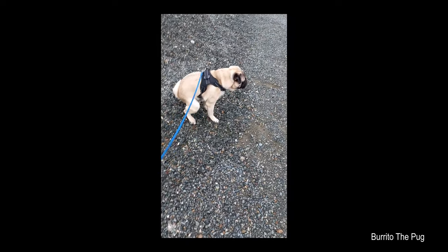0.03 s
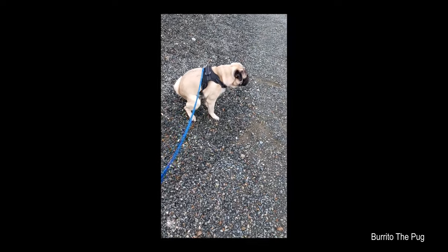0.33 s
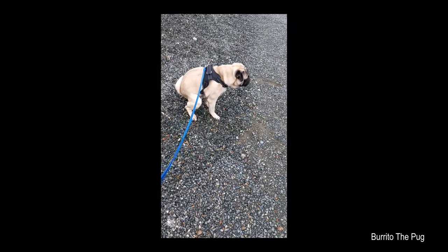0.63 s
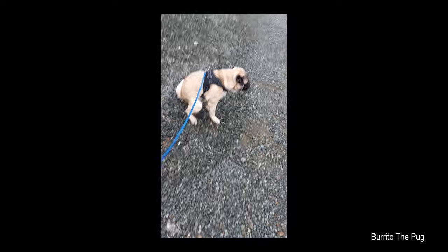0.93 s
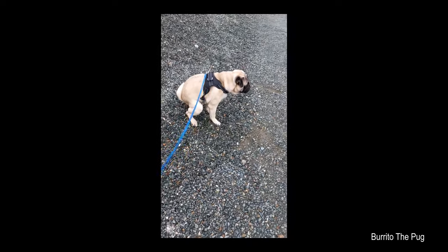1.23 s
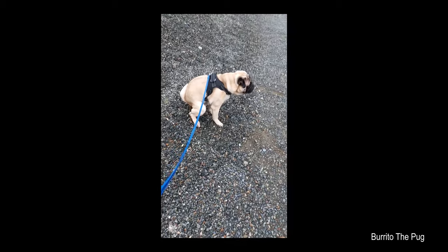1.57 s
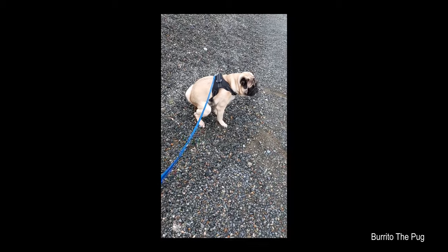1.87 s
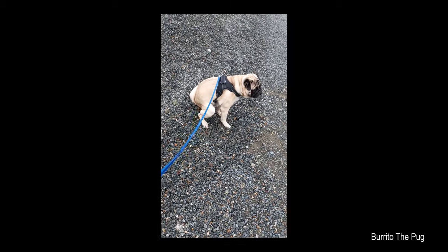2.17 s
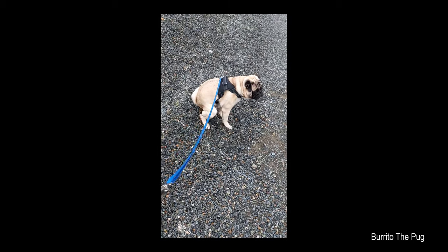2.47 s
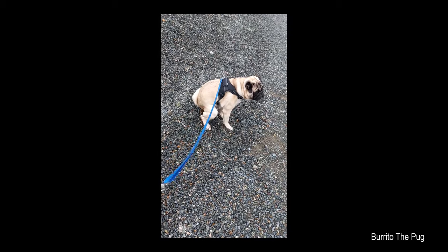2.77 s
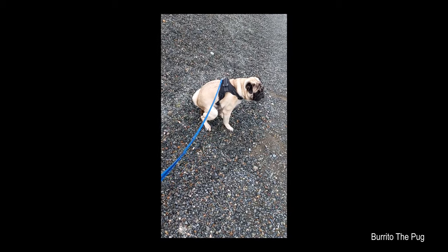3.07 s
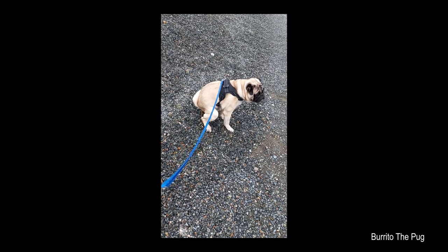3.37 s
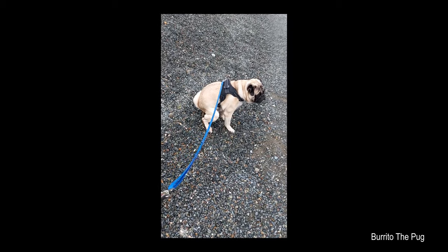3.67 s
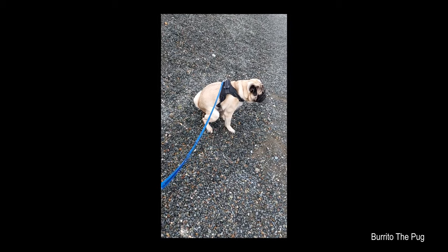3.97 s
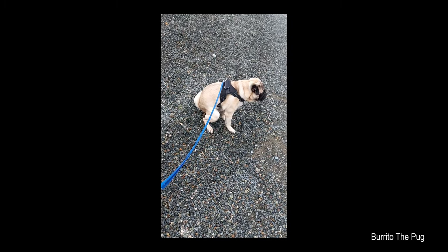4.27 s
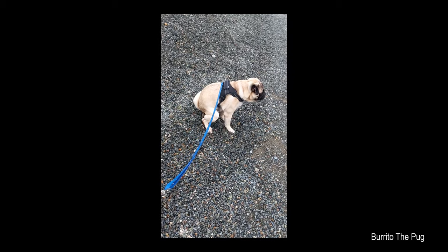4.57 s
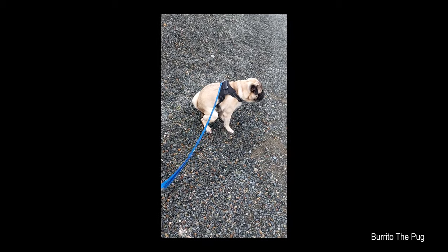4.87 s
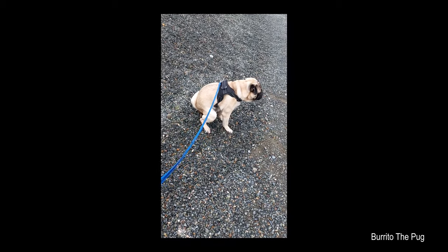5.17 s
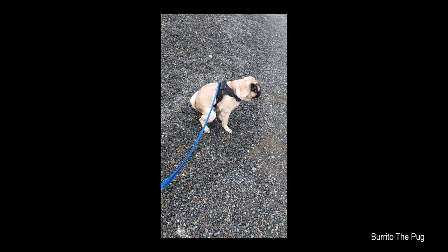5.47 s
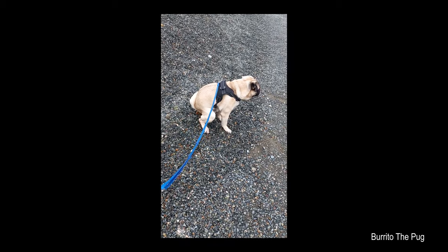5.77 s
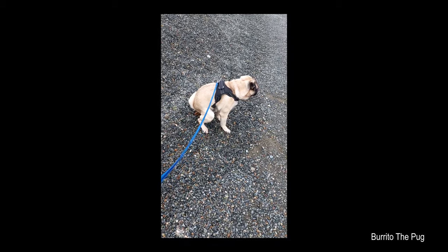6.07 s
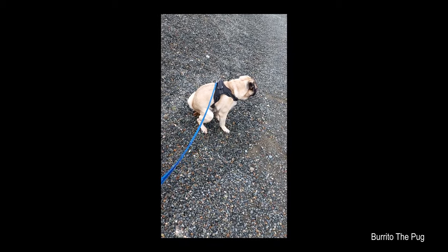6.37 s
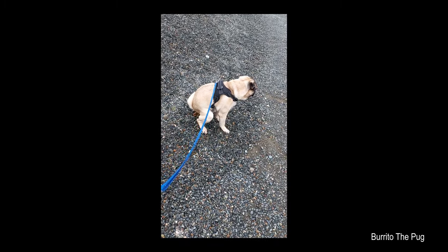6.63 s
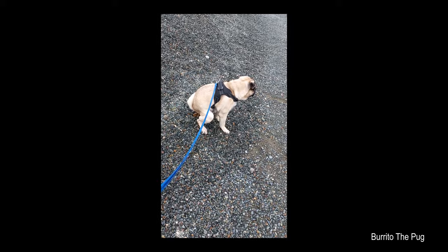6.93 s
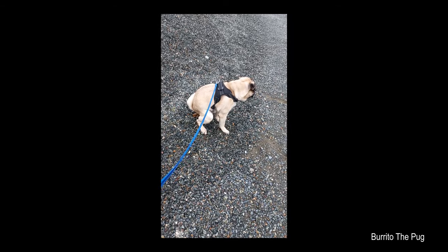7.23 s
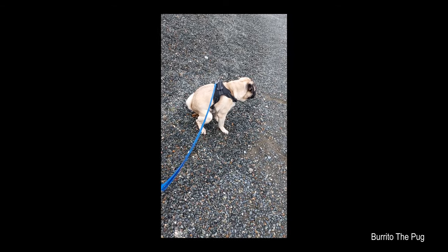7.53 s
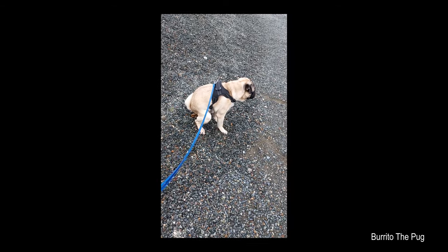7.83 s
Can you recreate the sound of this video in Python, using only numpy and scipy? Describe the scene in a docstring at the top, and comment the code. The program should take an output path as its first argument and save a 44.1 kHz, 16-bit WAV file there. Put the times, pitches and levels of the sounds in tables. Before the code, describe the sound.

Outdoors, wind and a far engine rumble while small birds chirp and whistle, and a leash occasionally scrapes close by.

```python
"""A gravel yard: wind rumble, distant traffic and hiss throughout; hoarse bird chips echo now and then.
From the start a far engine throbs, its uneven firings ringing the exhaust. Near 1 s a leash scrapes,
squeaks and ticks close by. A bird twitters at 2.5 s; the hand bumps the phone at 2.8 s and 4.3 s.
The engine fades by 3.7 s, then four thin, high two-note whistles echo off walls and trees.
From 7 s the leash scrapes again and the engine returns."""
import sys
import numpy as np
from scipy import signal
from scipy.fft import rfft, irfft
from scipy.io import wavfile
from scipy.ndimage import uniform_filter1d

SR = 44100
rng = np.random.default_rng(int(sys.argv[2]) if len(sys.argv) > 2 else 0)


def store_wav(level_fs):
    """Save 16-bit WAV to argv[1]."""
    pcm = np.round(np.clip(np.atleast_2d(level_fs), -1, 1) * 32767)
    wavfile.write(sys.argv[1], SR, pcm.T.astype(np.int16))


N = 357210
T = np.arange(N) / SR

# traffic level: t/s, level/dB
TRAFFIC_LEVEL = [(0.0, -70.5), (1.9, -70.5), (2.7, -72.5), (4.08, -72), (5.28, -74.5), (5.58, -71),
                 (8.1, -71.5)]
# spectra of traffic (mid, side), hiss and wind: f/Hz, level/dB
ROAD_MID_SPECTRUM = [(100, -8), (250, 1), (380, -2.5), (500, 1), (700, -6.5), (1000, -11), (1500, -16.5),
                     (2300, -22), (4000, -28.5)]
ROAD_SIDE_SPECTRUM = [(40, 4.5), (110, 4.5), (250, -4), (500, -9), (800, -12), (1200, -12), (1800, -15.5),
                      (2600, -24), (4000, -38)]
HISS_SPECTRUM = [(500, -12), (1500, 2.5), (2500, -0.5), (4000, 0.5), (5600, -2), (6700, 3.5), (7700, 1),
                 (8600, 1.5), (9400, -4.5), (11000, -2.5), (13000, -0.5), (15500, -3.5)]
WIND_SPECTRUM = [(20, -62), (31, -36.5), (39, -8), (45, -3.5), (56, -9), (75, 1), (120, -3), (155, -8.5),
                 (210, -14), (300, -26), (450, -40.5), (900, -61)]
# exhaust resonances: f/Hz, decay/s, level/dB
EXHAUST_MODES = [(88, 0.017, -18.5), (126.9, 0.022, 0.5), (175, 0.013, -12.5), (296, 0.0042, 3)]
# engine relative to wind: t/s, level/dB
ENGINE_OVER_WIND = [(0, -6), (.8, 0.5), (1.5, 4), (2.6, -4), (3.5, -3), (3.7, -19.5), (6.8, -17.5),
                    (8.1, -1.5)]
# wind plus engine: t/s, level/dB
RUMBLE_LEVEL = [(0.0, -57), (0.5, -52), (0.7, -56), (1.0, -46.5), (1.2, -51), (1.6, -43.5), (2.7, -51),
                (3.52, -46.5), (3.72, -55.5), (4.64, -52), (5.64, -53.5), (6.14, -60.5), (6.34, -55.0),
                (7.04, -57.0), (7.14, -52.5), (8.1, -51.5)]
# hand on the phone: t/s, rise/s, hold/s, decay/s, level/dB
HAND_BUMPS = [(2.798, 0.016, 0.068, 0.13, -32.5), (4.278, 0.03, 0.11, 0.059, -42)]
# hand rub: f/Hz, level/dB
RUB_SPECTRUM = [(28, -36), (45, -8), (75, 0.5), (120, 1.5), (160, -7.5), (205, -6), (260, -18), (350, -26),
                (500, -32), (700, -44.5), (1500, -56), (4000, -63.5)]
# phone judder in the grip: t/s, length/s, f0/Hz, f1/Hz, level/dB
GRIP_JUDDER = [(2.785, .08, 120, 112, -25)]
# leash scrapes: t/s, rise/s, hold/s, decay/s, level/dB, brightness/0-1, left-right/dB
LEASH_SCRAPES = [(0.811, 0.045, 0.02, 0.054, -61.5, 0.17, -3), (1.033, 0.017, 0.018, 0.043, -73, 0.5, 0),
                 (1.453, 0.019, 0.046, 0.043, -49.5, 1, 1.5), (2.144, .008, 0.026, 0.12, -66, 0.03, -3),
                 (2.977, 0.065, 0.087, 0.075, -69.5, 0.13, -2),
                 (7.148, 0.031, 0.019, 0.082, -62.5, 0.13, -2.5),
                 (7.613, 0.0025, 0.01, 0.033, -61.5, 0.84, 1), (7.622, 0.047, 0.23, 0.18, -71.5, 0, -1.5),
                 (7.752, 0.043, 0.031, 0.033, -51.5, 1, 2)]
# leash squeaks: t/s, length/s, f0/Hz, f1/Hz, level/dB
LEASH_SQUEAKS = [(.835, .066, 3400, 2900, -70), (.845, .11, 2635, 2620, -66.5),
                 (7.18, .05, 2100, 2000, -72.5), (7.2, .025, 2640, 2630, -65)]
# clasp and grit ticks: t/s, level/dB
CLASP_TICKS = [(1.011, -56), (1.48, -46.5), (7.618, -51), (7.763, -53), (7.856, -54)]
# spectra of scrapes and ticks: f/Hz, level/dB
DULL_SPECTRUM = [(900, -20), (1600, -7), (2100, -6.5), (2650, -8.5), (3600, -3.5), (4400, -7), (5400, -10),
                 (6300, -7.5), (7600, -3), (8600, -10.5), (11000, -18.5), (15500, -31)]
BRIGHT_SPECTRUM = [(1500, -39), (3200, -9.5), (5000, -3.5), (6300, -9.5), (7400, 5), (8500, -5.5),
                   (9800, -1.5), (11500, 5.5), (13500, -1), (15500, 4.5)]
TICK_SPECTRUM = [(1500, -3), (4000, -4), (7500, 14.5), (10000, 11), (15500, -6)]
# hand shading the left mic port: f/Hz, gain/dB
HAND_SHADE = [(500, 3), (8500, -1.5), (12000, -8), (16000, -15)]
# faint far whistles and hoarse chips: t/s, length/s, f0/Hz, f1/Hz, level/dB
FAR_NOTES = [(1.3, 0.55, 1660, 1584, -79), (2.93, .62, 1840, 1290, -75.5), (5.08, 0.16, 4140, 4250, -77.5),
             (5.1, 0.74, 2506, 2492, -83), (5.22, 0.077, 3930, 3900, -74), (5.23, 0.36, 4810, 4800, -74),
             (5.35, 0.43, 1246, 1217, -77), (6.08, 0.55, 2506, 2520, -80.5), (6.61, 0.28, 4870, 4880, -70),
             (7.08, .036, 3840, 3830, -57.5), (7.1, .22, 4170, 3680, -67.5)]
CHIP_NOTES = [(.412, 0.068, 4900, 3580, -65.5), (1.575, 0.035, 3300, 5120, -64.5),
              (1.745, 0.046, 2940, 5130, -70.5), (3.36, 0.03, 3060, 3900, -79),
              (3.5, 0.039, 2750, 5200, -73), (4.305, 0.03, 5500, 4350, -65.5),
              (4.805, .031, 3200, 4450, -73), (6.985, 0.057, 4600, 3860, -66.5),
              (7.13, 0.12, 3400, 3070, -74)]
# runs of falling notes: t/s, length/s, rate/Hz, level/dB
TWITTER_RUNS = [(2.456, .21, 32, -58), (2.713, 0.11, 39, -56.5)]
# two-note whistles: t/s, length1/s, length2/s, f1/Hz, glide1/Hz, f2/Hz, glide2/Hz,
# level at step/dB, swell/(dB/s), overtone/dB, rasp/dB
WHISTLE_CALLS = [(3.921, 0.38, 0.39, 5588, 191, 6040, 89, -59, 2, -20, -20),
                 (5.325, 0.41, 0.28, 5155, -35, 5264, 9, -49, 14.5, -25.5, -24),
                 (6.674, .335, 0.0984, 5165, 110, 5250, -165, -48, 35, -20, -15),
                 (7.64, 0.24, .25, 5075, 29.5, 5240, -130, -58.5, 20, -35, -10.5)]


def undb(db):
    """Decibels to gain."""
    return 10 ** (np.asarray(db) / 20)


def unit(x):
    """Scale to rms 1."""
    return x / np.sqrt(np.mean(x ** 2))


def curve(rows):
    """Linear interpolation of (t/s, value) rows."""
    return np.interp(T, *np.transpose(rows))


def colour(x, spectrum):
    """Filter by (f/Hz, level/dB) rows; 12 dB/octave skirts outside."""
    hz, db = np.transpose(spectrum)
    f = np.arange(N // 2 + 1) * SR / N + 1
    skirts = np.minimum(f / hz[0], 1) * np.minimum(hz[-1] / f, 1)
    gain = undb(np.interp(np.log(f), np.log(hz), db))
    return irfft(rfft(x) * gain * skirts ** 2, N)


def noise(spectrum, channels=1):
    """Independent coloured noises, rms 1."""
    return unit(colour(rng.standard_normal((channels, N)), spectrum))


def walk(rate_hz):
    """Smooth random drift, spread near 1."""
    k = max(int(SR / rate_hz), 1)
    steps = rng.standard_normal(N)[np.arange(N) // k]
    return 1.3 * uniform_filter1d(uniform_filter1d(steps, k), k)


def swell(start_s, rise_s, hold_s, decay_s):
    """Contact envelope: ramp, hold, exponential decay."""
    t = T - start_s
    return np.clip(t / rise_s, 0, 1) * np.exp(-np.maximum(t - rise_s - hold_s, 0) / decay_s)


def pan(db):
    """Gains for a left-minus-right level."""
    return undb(np.array([[db], [-db]]) / 2)


def tones(notes, waver, rasp_db, rasp_hz, edge, bend=0, overtone_db=-24):
    """Wavering glides with a hoarse noise band. edge: fade share; bend > 0: fast at first."""
    out = np.zeros(N)
    drift = 1 + waver * walk(90)
    rasp = 1 + undb(rasp_db) * (walk(rasp_hz) + 1j * walk(rasp_hz))
    for start_s, length_s, first_hz, last_hz, db in notes:
        span = slice(int(start_s * SR), min(int((start_s + length_s) * SR), N))
        u = np.clip((T[span] - start_s) / length_s, 0, 1)
        hz = first_hz + (last_hz - first_hz) * (u + bend * u * (1 - u))
        phasor = np.exp(2j * np.pi * np.cumsum(hz * drift[span]) / SR)
        fade = np.sin(np.pi / 2 * np.clip(np.minimum(u, 1 - u) / edge, 0, 1))
        out[span] += undb(db) * fade * np.imag(rasp[span] * (phasor + undb(overtone_db) * phasor ** 2))
    return out


def yard(x, t60_s, wet_db, direct_db):
    """Direct sound reaches the left port first; walls and trees scatter to both."""
    t = T[:SR]
    echoes = rng.standard_normal((2, SR)) ** 3 * undb(-60 * t / t60_s) * np.minimum(t / 0.021, 1)
    wet = signal.fftconvolve(x[None], echoes, axes=1)[:, :N]
    wet *= np.std(x) / np.std(wet, axis=1, keepdims=True)
    direct = np.array([x, np.roll(x, 16)])
    return undb(direct_db) * direct + undb(wet_db) * wet


def traffic_and_hiss():
    """Distant traffic swells under a wide hiss; the treble flickers."""
    road = noise(ROAD_MID_SPECTRUM) + undb(1) * noise(ROAD_SIDE_SPECTRUM) * np.array([[1], [-1]])
    hiss = undb(-76) * noise(HISS_SPECTRUM, channels=2)
    flicker = undb(-85 + 1.3 * walk(9)) * noise([(6300, -9.5), (7500, 6.5), (8700, -15)], channels=2)
    road_db = curve(TRAFFIC_LEVEL) + 1.4 * walk(7.1)
    return pan(0.99) * road * undb(road_db) + pan(-0.49) * (hiss + flicker)


def engine(firing_hz=19.9):
    """Firings of uneven strength ring the low exhaust resonances."""
    cycle = (T * firing_hz).astype(int)
    pulses = np.diff(cycle, prepend=0) * undb(2.04 * rng.standard_normal(N)[cycle])
    t = T[:SR // 4]
    pipe = sum(undb(db) * np.cos(2 * np.pi * hz * t) * np.exp(-t / decay_s)
               for hz, decay_s, db in EXHAUST_MODES)
    pipe *= np.minimum(t / 0.0036, 1)  # distance blurs each firing
    throb = signal.fftconvolve(pulses, pipe)[:N]
    return unit(colour(throb, [(55, 12), (200, 6.5), (330, -4.5), (600, -28)]))


def rumble():
    """Wind and far engine, common to both ports, plus eddies at each."""
    ratio = undb(curve(ENGINE_OVER_WIND))
    bass = (noise(WIND_SPECTRUM) + ratio * engine()) / np.sqrt(1 + ratio ** 2)
    eddies = undb(-17) * noise(WIND_SPECTRUM, channels=2)
    return (bass + eddies) * undb(curve(RUMBLE_LEVEL))


def bumps():
    """The hand rubs the phone twice; the grip judders the first time."""
    push = sum(undb(db) * swell(*timing_s) for *timing_s, db in HAND_BUMPS)
    rub = noise(RUB_SPECTRUM) + undb(-13.5) * noise(RUB_SPECTRUM, channels=2)
    judder = tones(GRIP_JUDDER, waver=0.016, rasp_db=-22.5, rasp_hz=100.6, edge=0.31, overtone_db=-21.5)
    return push * rub + judder


def leash():
    """Webbing slides in tiny slips and squeaks; clasp and grit tick."""
    dull = noise(DULL_SPECTRUM, channels=2)
    left, right = noise(BRIGHT_SPECTRUM, channels=2)
    bright = np.array([colour(left, HAND_SHADE), right])
    scrapes = np.zeros((2, N))
    for *timing_s, db, brightness, pan_db in LEASH_SCRAPES:
        friction = np.sqrt(1 - brightness) * dull + np.sqrt(brightness) * bright
        scrapes += pan(pan_db) * undb(db) * swell(*timing_s) * friction
    slips = undb(1.8 * walk(450))
    hits = sum(undb(db) * swell(start_s, 0.00068, 0.00052, 0.00038) for start_s, db in CLASP_TICKS)
    ticks = hits * noise(TICK_SPECTRUM, channels=2)
    squeaks = tones(LEASH_SQUEAKS, waver=0.007, rasp_db=-8, rasp_hz=700, edge=0.3, overtone_db=-10)
    return scrapes * slips + pan(-3.6) * ticks + yard(squeaks, t60_s=0.26, wet_db=2, direct_db=3)


def twitter(top_hz=6100, fall_hz=610, note_s=0.016, crest=0.4, slope_db_per_run=22.5):
    """Quick runs of one falling note, pitch scattered, loudest at the crest."""
    notes = []
    for start_s, length_s, rate_hz, db in TWITTER_RUNS:
        for t in np.arange(0, length_s, 1 / rate_hz):
            hz = top_hz + 70 * rng.standard_normal()
            drop_db = slope_db_per_run * abs(t / length_s - crest)
            notes.append((start_s + t, note_s, hz, hz - fall_hz, db - drop_db))
    return tones(notes, waver=0.012, rasp_db=-7.5, rasp_hz=698, edge=0.52, bend=-0.4)


def whistle(start_s, first_s, second_s, first_hz, first_glide_hz, second_hz, second_glide_hz,
            db, swell_db_per_s, overtone_db, rasp_db, overlap_s=0.059):
    """Two thin notes; swells up to the step between them, then fades."""
    step_s = start_s + first_s
    notes = [(start_s, first_s + overlap_s, first_hz, first_hz + first_glide_hz, db),
             (step_s, second_s, second_hz, second_hz + second_glide_hz, db)]
    voice = tones(notes, waver=0.005, rasp_db=rasp_db, rasp_hz=450, edge=0.22, bend=0.9,
                  overtone_db=overtone_db)
    return voice * undb(-swell_db_per_s * np.abs(T - step_s))


def birds():
    """Whistles, chips and twitters; distance leaves the whistles mostly echo."""
    whistles = sum(whistle(*row) for row in WHISTLE_CALLS) * undb(2.2 * walk(55))
    far = tones(FAR_NOTES, waver=0.012, rasp_db=-10, rasp_hz=300, edge=0.3)
    chips = tones(CHIP_NOTES, waver=0.05, rasp_db=-2.5, rasp_hz=1200, edge=0.35, bend=0.6)
    twitters = twitter()
    return (pan(-2.3) * yard(whistles, t60_s=0.64, wet_db=-1.5, direct_db=-8)
            + pan(-2.4) * yard(far, t60_s=0.58, wet_db=-1.5, direct_db=-4.5)
            + pan(-3) * yard(chips, t60_s=0.16, wet_db=-1, direct_db=2)
            + pan(-1.2) * yard(twitters, t60_s=0.4, wet_db=-1.5, direct_db=-2))


def scene():
    """All sources at the two ports."""
    return rumble() + traffic_and_hiss() + bumps() + leash() + birds()


def record(dry):
    """The phone's steep low-pass."""
    cutoff_hz = 15750
    return signal.sosfilt(signal.ellip(10, 0.2, 70, cutoff_hz, fs=SR, output="sos"), dry)


dry = scene()
out = record(dry)
store_wav(out)
```